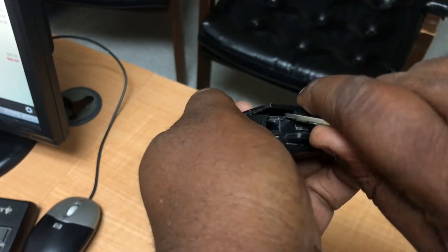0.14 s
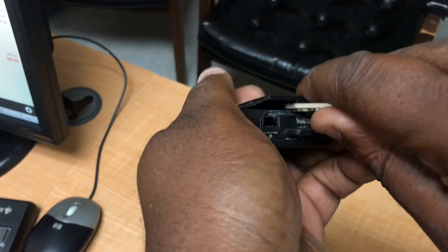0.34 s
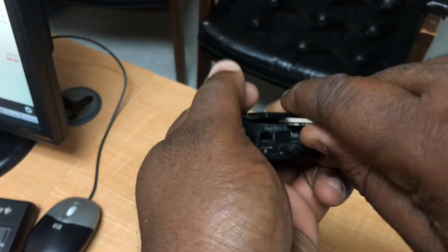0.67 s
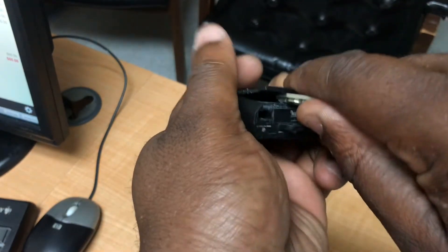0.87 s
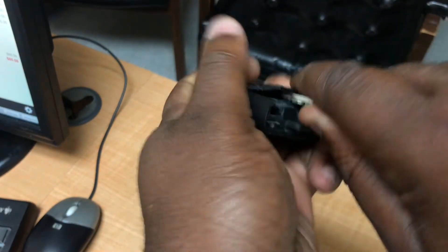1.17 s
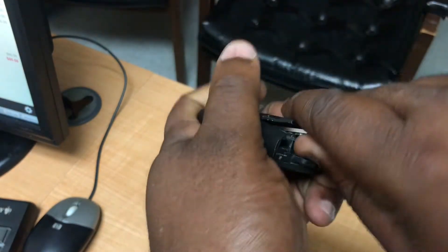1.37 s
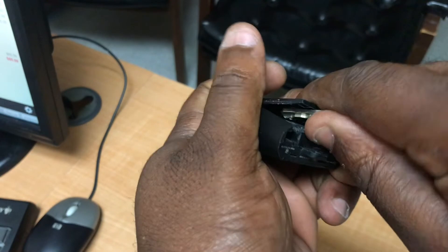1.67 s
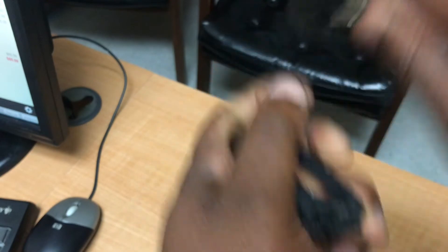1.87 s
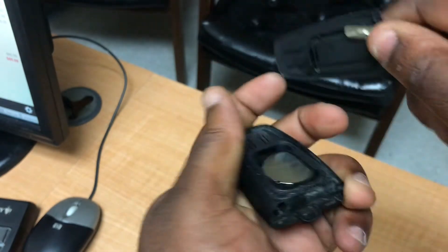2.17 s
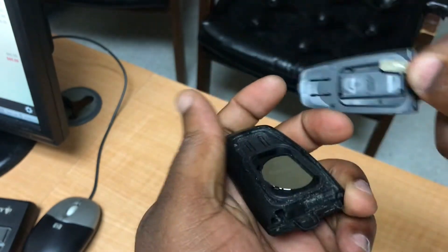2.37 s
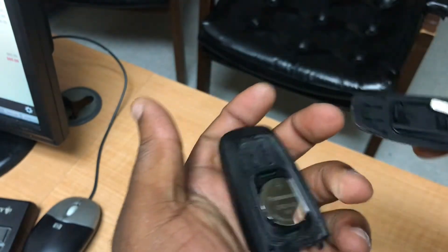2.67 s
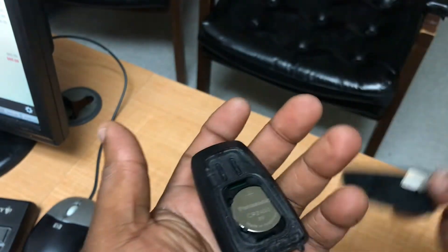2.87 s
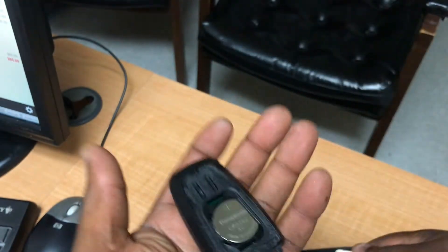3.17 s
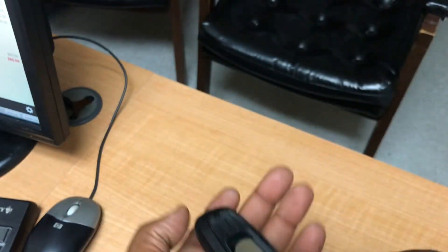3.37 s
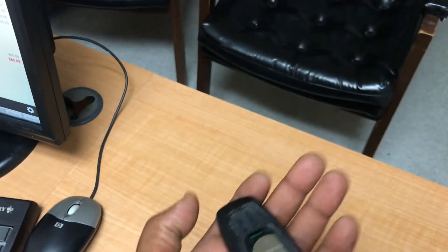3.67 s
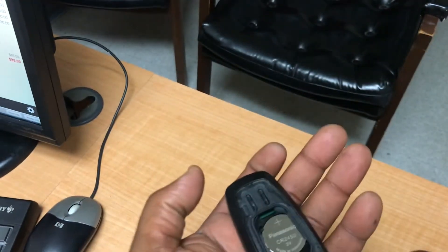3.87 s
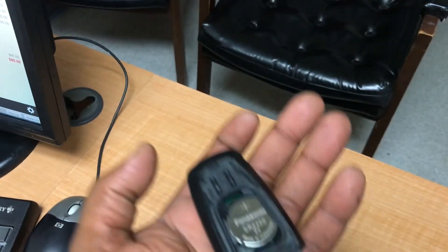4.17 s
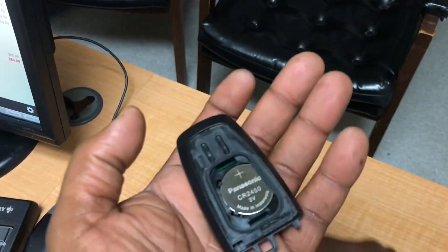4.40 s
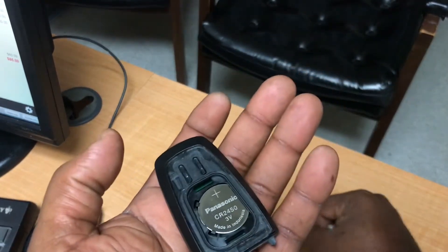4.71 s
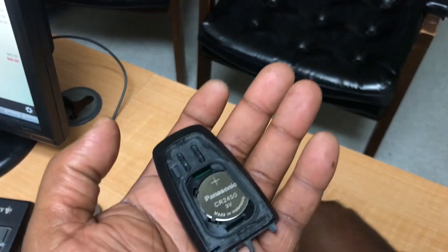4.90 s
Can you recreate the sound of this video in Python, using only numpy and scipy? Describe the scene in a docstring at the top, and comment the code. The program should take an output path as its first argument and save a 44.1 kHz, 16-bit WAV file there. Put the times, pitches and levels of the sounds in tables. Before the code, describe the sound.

A plastic key fob shell clicks while being pried, snaps open loudly, then its lid rattles onto a wooden desk, followed by a knock and short slide.

```python
"""A plastic key fob is pried apart with its metal key: the shell creaks and clicks, then snaps open.
Its lid rocks to rest on a wooden desk, and the key is laid down with a knock and slid over the wood.
Blows are sums of decaying modes with a noise crack; friction is a train of random slips, filtered.
A small office adds reflections; mains hum and ventilation lie underneath."""
import sys
import numpy as np
from scipy import signal
from scipy.fft import rfft, irfft
from scipy.io import wavfile

SR = 44100
rng = np.random.default_rng(int(sys.argv[2]) if len(sys.argv) > 2 else 0)


def int16_out(signal):
    """Quantize to a 16-bit WAV file."""
    q = np.round(np.clip(np.atleast_2d(signal).T, -1, 1) * 32767)
    wavfile.write(sys.argv[1], SR, q.astype(np.int16))


N = 222528
TIME = np.arange(N) / SR
BLOW_TIME = TIME[:SR // 5]  # time axis of one blow [s]

# the key levers the seam and it gives a little:
# (time [s], peak level of the ring [dB], contact time [ms], pitch factor)
PRIES = [(.118, -23, .17, 0.88), (.5702, -3.5, 0.0043, 1), (.7155, -36, 0.21, 1),
         (1.2522, -34.5, .09, 0.94), (1.3645, -27, 0.15, 0.83), (1.3727, -21.5, 0.092, 0.99),
         (1.6495, -51.5, 0.24, 0.97), (1.8608, -40, 0.087, 1)]
FIRM_DB = -35  # pries above this ring level are firm


def amp(db):
    """Level to amplitude: 20 dB is a factor of ten."""
    return 10 ** (np.asarray(db) / 20)


def unit(x):
    """Normalization to an rms value of 1."""
    return x / np.sqrt(np.mean(x ** 2) + 1e-20)


def read(points, hz):
    """Linear interpolation of a table on a logarithmic frequency axis."""
    table_hz, value = np.transpose(points)
    return np.interp(np.log(hz + 1), np.log(table_hz), value)


def colour(x, spectrum):
    """Spectral shaping: a gain at each frequency, then rms 1."""
    gain = amp(read(spectrum, np.fft.rfftfreq(len(x), 1 / SR)))
    return unit(irfft(rfft(x) * gain, len(x)))


def add(mix, start_s, sound):
    """Superposition: a sound is summed into the mix from its start time."""
    part = mix[max(round(start_s * SR), 0):][:len(sound)]
    part += sound[:len(part)]


def decay(t60_s):
    """Exponential damping: the level falls by 60 dB in t60."""
    return np.exp(-np.log(1000) * BLOW_TIME / t60_s)


def ringing(x, hz, quality, broad_db):
    """Resonance: one peak of given quality factor stands out of a broad bright band."""
    ring = signal.lfilter(*signal.iirpeak(min(hz, SR / 2 - 1), quality, SR), x)
    broad = signal.lfilter(*signal.butter(2, 1500, "high", fs=SR), x)
    return unit(unit(ring) + amp(broad_db) * unit(broad))


def grains(per_s, spread_db):
    """Friction as a random point process: tiny slips of uneven size and either sign."""
    size = amp(spread_db * np.minimum(rng.exponential(1, N), 4))
    sign = rng.choice([-1, 1], N)
    happens = rng.random(N) < per_s / SR
    return size * sign * happens


def blows(rows, modes, crack, rise_s, crack_t60):
    """Modal excitation: a brief crack and the body's modes; long contact excites fewer high ones."""
    hz, db, t60 = np.transpose(modes)[:, :, None]
    sign = (-1) ** np.arange(len(modes))[:, None]
    out = np.zeros(N)
    for start_s, ring_db, crack_db, pitch, contact_ms in rows:
        weight = sign * amp(db) / (1 + (hz * contact_ms / 500) ** 2)
        swell = 1 - np.exp(-BLOW_TIME * hz / (rise_s * hz.mean()))  # low modes take longer to start
        partials = weight * swell * decay(t60) * np.sin(2 * np.pi * hz * pitch * BLOW_TIME)
        ring = partials.sum(0)
        burst = colour(rng.standard_normal(len(BLOW_TIME)), crack) * decay(crack_t60)
        add(out, start_s, amp(ring_db) * ring / abs(ring).max() + amp(crack_db) * burst)
    return out


def cracking(rows, crack_db, dull_db_per_ms):
    """Contact mechanics: the crack follows the blow's strength and fades as contact lengthens."""
    return [(start_s, db, db + crack_db - dull_db_per_ms * contact_ms, pitch, contact_ms)
            for start_s, db, contact_ms, pitch in rows]


def blade_slips():
    """Stress release: a faint slip of the blade just before each firm pry."""
    lead_s, slip_db, contact_ms = .0235, -49, .04
    return [(start_s - lead_s, slip_db, contact_ms, pitch)
            for start_s, db, _, pitch in PRIES if db > FIRM_DB]


def prying():
    """Damped modes: the closed shell clicks at each pry, its ring shortened by the hand."""
    # modes of the closed shell: (frequency [Hz], relative level [dB], t60 [s])
    shell_modes = [(1008, -10.5, .015), (1234, -9, 0.012), (1676, -6.5, 0.011), (2039, 2, 0.0085),
                   (3480, -5.5, 0.0062), (4500, -15.5, 0.0066), (5500, -14, .004), (8400, -10.5, 0.0037),
                   (12122, -6, .0025)]
    # crack at the contact point: (frequency [Hz], relative spectral level [dB per Hz])
    crack_spectrum = [(200, -25), (900, -11.5), (2000, -4), (4000, -4), (5500, -1.5), (7200, -6),
                      (8600, -0.5), (10000, -5), (11800, 0.5), (16000, -5)]
    rows = cracking(PRIES + blade_slips(), crack_db=-4.5, dull_db_per_ms=68.5)
    return blows(rows, shell_modes, crack_spectrum, rise_s=0.00048, crack_t60=0.0077)


def opening():
    """Sudden release: the catches let go one after another and set lid and key ring sounding."""
    # releases: (time [s], peak level of the ring [dB], contact time [ms], pitch factor)
    snaps = [(1.8829, -2.5, .015, 0.99), (1.8857, -8, .05, 1.014), (1.8871, -11.5, .075, .947),
             (1.9265, -27.5, .025, 0.7)]
    # modes of the freed lid; the last, long and faint one is the key ring:
    # (frequency [Hz], relative level [dB], t60 [s])
    lid_and_key_ring_modes = [(257, -21.5, 0.027), (371.6, -18.5, 0.027), (660, -11.5, 0.02),
                              (969, -5.5, 0.037), (1484, -8, .014), (1674.5, -7, .02), (1983, -2, 0.023),
                              (2320, -5, 0.023), (2730, -5.5, 0.012), (3150, -2, 0.014), (3680, -7, .01),
                              (4443, -3.5, .01), (5650, -6, .006), (3060, -43.5, .6)]
    # crack of the splitting seam: (frequency [Hz], relative spectral level [dB per Hz])
    split_spectrum = [(150, -21), (600, -1.5), (2000, 0), (4000, 0), (6000, -3), (8000, -12.5), (11000, -9),
                      (16000, -16)]
    rows = cracking(snaps, crack_db=-6.5, dull_db_per_ms=105)
    return blows(rows, lid_and_key_ring_modes, split_spectrum, rise_s=0.00042, crack_t60=0.015)


def landings(count):
    """Energy loss in rocking: swings shorten, and landings soften and weaken overall."""
    # graze, landing and rebound of the rim: (delay [s], level offset [dB], extra contact time [ms])
    rim_points = [(-.0028, -16, 0), (0, 1, 0.0059), (.0027, -2, 0.052)]
    first_s, gap_s, gap_ratio = 3.8946, .0732, .914
    # loss per e-fold of the swing count; the lean favours every other landing, on the heavy side
    start_db, loss_db, lean_db = -28, 5, 1.1
    first_contact_ms, soften_ms = 0.034, 0.068  # softening per e-fold of the swing count
    mean_pitch, pitch_scatter = 0.98, 0.048  # every landing meets another spot of the rim
    rows, swing_s = [], first_s
    for k, spot in enumerate(rng.uniform(-1, 1, count)):
        level_db = start_db - loss_db * np.log(1 + k) - lean_db * (-1) ** k
        contact_ms = first_contact_ms + soften_ms * np.log(1 + k)
        pitch = mean_pitch + pitch_scatter * spot
        rows += [(swing_s + delay, level_db + db, contact_ms + extra_ms, pitch)
                 for delay, db, extra_ms in rim_points]
        swing_s += gap_s * gap_ratio ** k
    return rows


def rocking():
    """Repeated impact: the lid's rim strikes the desk top from side to side until it rests."""
    # modes of the rim against the desk: (frequency [Hz], relative level [dB], t60 [s])
    rim_modes = [(383, 0.5, 0.021), (587, 0, 0.04), (935, -2.5, 0.086), (1123, -6.5, 0.013),
                 (1605, -3.5, 0.017), (2140, -4, 0.014), (2700, -8, 0.018), (3860, 1, 0.0044),
                 (5430, -5, 0.014)]
    # clack of the contact: (frequency [Hz], relative spectral level [dB per Hz])
    clack_spectrum = [(150, 6), (600, 8), (1500, 6), (3800, 2), (5400, -10.5), (6500, -10), (10500, -45),
                      (12500, -19.5), (16000, -22)]
    rows = cracking(landings(count=6), crack_db=3.0, dull_db_per_ms=58)
    return blows(rows, rim_modes, clack_spectrum, rise_s=0.00087, crack_t60=0.016)


def knocking():
    """Plate modes: things and knuckles land on the desk top, which answers with its resonances."""
    # knocks: (time [s], peak ring level [dB], initial crack level [dB], pitch factor, contact time [ms])
    knocks = [(3.6957, -30.5, -26, 0.88, 0.38), (3.7106, -34.5, -31.5, 0.96, 0.49),
              (3.7278, -43, -41, 0.96, 0.192), (4.2432, -15.5, -46, 0.97, 0.068),
              (4.2562, -22.5, -27.5, 1, 0.14)]
    # modes of the desk top: (frequency [Hz], relative level [dB], t60 [s])
    desk_modes = [(147, -13.5, 0.062), (222.3, -7, 0.07), (281.4, -1.5, 0.066), (398, -1.5, 0.047),
                  (596, -8.5, 0.062), (703, -6.5, 0.045), (934, -3, 0.033), (1305, -6.5, 0.029),
                  (1906, -12, 0.021)]
    # tap of the contact: (frequency [Hz], relative spectral level [dB per Hz])
    tap_spectrum = [(150, -11), (900, -12), (1500, -14), (2800, -2), (3900, -4), (5700, -2.5), (7000, -9.5),
                    (11000, -10), (15500, -7.5)]
    return blows(knocks, desk_modes, tap_spectrum, rise_s=0.0006, crack_t60=0.015)


def slide():
    """Friction of the key: slips drive the desk's resonances; finer ones hiss, a few crackle."""
    # course of the slide: (time [s], wood drone level [dB], hiss level [dB]), both before a fixed trim
    course = [(4.285, -33, -72), (4.305, -39.5, -57.5), (4.431, -42, -52.5), (4.455, -38.5, -56.5),
              (4.521, -39.5, -52), (4.533, -45.5, -53.5), (4.597, -40.5, -59.5), (4.643, -56.5, -66),
              (4.7, -66, -66.5)]
    # drone of the wood: (frequency [Hz], relative spectral level [dB per Hz])
    grain_spectrum = [(120, -19), (250, 3), (420, 0.5), (500, -10.5), (590, 4), (740, -12), (910, -3.5),
                      (1120, -15), (1350, -13.5), (2000, -20), (4000, -31.5), (8000, -43)]
    # hiss of the fine slips: (frequency [Hz], relative spectral level [dB per Hz])
    scrape_spectrum = [(800, -6), (2500, 4), (4000, 7), (5700, 4), (7300, -5), (9000, 4), (10500, -2.5),
                       (13000, 5), (16000, 3.5)]
    knot_s, drone_db, hiss_db = np.transpose(course)
    drone = colour(grains(per_s=1200, spread_db=2.0), grain_spectrum)
    drone *= amp(np.interp(TIME, knot_s, drone_db) - 1.0)
    hiss = colour(grains(per_s=3500, spread_db=2.5), scrape_spectrum)
    crackle = ringing(grains(per_s=170, spread_db=-0.5), hz=5170, quality=3.6, broad_db=-8)
    scrape = (hiss + amp(-6.5) * crackle) * amp(np.interp(TIME, knot_s, hiss_db) - 1.8)
    fade = np.clip(np.minimum(TIME - knot_s[0], knot_s[-1] - TIME) / 0.011, 0, 1)
    return (drone + scrape) * fade


def blade(t60):
    """Resonant decay: the metal blade ticks brightly on what it touches."""
    # ticks: (time [s], level before the decay [dB rms], resonance [Hz])
    ticks = [(1.9484, -19.5, 9800), (1.9507, -25, 8000), (1.9592, -18.5, 3950), (2.8584, -55, 6010),
             (4.2522, -28.5, 4600), (4.262, -28.5, 4500), (4.8184, -51, 4500)]
    out = np.zeros(N)
    for start_s, db, hz in ticks:
        tick = ringing(rng.standard_normal(len(BLOW_TIME)), hz, quality=5.7, broad_db=-8.5)
        add(out, start_s, amp(db) * tick * decay(t60))
    return out


def fingers():
    """Granular friction: fingers shift their grip; shell and blade strain around each pry."""
    # shifts of the grip: (time [s], length [s], level before the window [dB rms], centre [Hz])
    rubs = [(0.032, 0.039, -64, 12500), (1.077, 0.037, -68, 10940), (1.35, .046, -50, 5100),
            (2.447, 0.1, -66.5, 3550), (2.703, 0.029, -58.5, 2450), (4.695, .16, -68, 13030),
            (4.9, .062, -60.5, 13500)]
    # creak of the loaded shell, scrape of the blade: (lead before the pry [s], length [s],
    # level at FIRM_DB before the window [dB rms], slope [dB per dB of pry level], centre [Hz])
    strain_kinds = [(0.088, 0.18, -68, 0.1668, 2000), (0.024, 0.046, -65.5, 0.4263, 16000)]
    out, slips = np.zeros(N), grains(per_s=11000, spread_db=3.5)
    strain = [(max(pry_s - lead, 0), length, db + follow * (pry_db - FIRM_DB), hz)
              for pry_s, pry_db, _, _ in PRIES
              for lead, length, db, follow, hz in strain_kinds]
    for start_s, length, db, hz in rubs + strain:
        piece = slips[round(start_s * SR):][:round(length * SR)]
        stroke = ringing(piece, hz, quality=4.2, broad_db=-4.0)
        add(out, start_s, amp(db) * stroke * np.hanning(len(stroke)))
    return out


def squeak():
    """Stick and slip of the plastic, rendered as noise through a sharp resonance: a narrow tone."""
    # one squeak: (time [s], length [s], level before the window [dB rms], frequency [Hz])
    start_s, length, db, hz = (2.625, .075, -68, 2390)
    out = np.zeros(N)
    tone = ringing(rng.standard_normal(round(length * SR)), hz, quality=45, broad_db=-24.5)
    add(out, start_s, amp(db) * tone * np.hanning(len(tone)))
    return out


def palm():
    """Damped oscillation: soft low pushes as the fob jolts in the hand and is caught."""
    # jolts: (time [s], initial amplitude [dB], frequency [Hz], t60 [s])
    jolts = [(1.366, -43, 150, 0.037), (1.9501, -28, 205, 0.014), (1.9523, -39.5, 75, 0.085),
             (1.9603, -30.5, 108, 0.03)]
    out = np.zeros(N)
    for start_s, db, hz, t60 in jolts:
        add(out, start_s, amp(db) * np.sin(2 * np.pi * hz * BLOW_TIME) * decay(t60))
    return out


def room(x, wet_db, early):
    """Reverberation: strong early reflections off desk and screen, a tail dying band by band."""
    # reverberation time: (frequency [Hz], t60 [s])
    reverberation = [(150, 0.62), (600, 0.42), (2000, 0.34), (4000, 0.4), (9000, .33), (16000, 0.2)]
    taps, t = np.zeros(SR), TIME[:SR]
    at = np.arange(0, SR - 10, 10)
    taps[at + rng.integers(0, 10, len(at))] = rng.choice([-1, 1], len(at))
    hz, age, bands = signal.stft(taps, SR, nperseg=256)
    bands = bands * amp(-60 * age / read(reverberation, hz)[:, None])
    tail = signal.istft(bands, SR, nperseg=256)[1][:SR]
    tail *= 1 - np.exp(-np.maximum(t - .0025, 0) / 0.0017)  # nothing before 2.5 ms
    tail *= 1 + early * np.exp(-(t / .033) ** 4)
    return x + amp(wet_db) * signal.fftconvolve(x, tail / np.linalg.norm(tail))[:N]


def office():
    """Stationary background: ventilation as shaped noise, and hum tones of wavering phase."""
    # ventilation rumble: (frequency [Hz], relative spectral level [dB per Hz])
    air_spectrum = [(22, -49.5), (36, -7), (75, -3.5), (130, -3), (200, -8.5), (300, -12.5), (450, -17.5),
                    (650, -22.5), (1300, -28.5), (2500, -32.5), (5000, -36.5), (10000, -39), (12500, -38.5),
                    (16000, -39)]
    # mains hum and ventilation tones: (frequency [Hz], level [dB rms])
    hum_tones = [(39, -66.5), (59.2, -60), (72.5, -62), (118.4, -70), (145, -71), (176.8, -63), (210, -75),
                 (241, -67), (382, -79.5)]
    out = amp(-60.5) * colour(rng.standard_normal(N), air_spectrum)
    knots = np.linspace(0, TIME[-1], 20)
    for hz, db in hum_tones:
        drift = 0.41 * np.interp(TIME, knots, rng.standard_normal(len(knots)))  # phase [rad]
        out += np.sqrt(2) * amp(db) * np.sin(2 * np.pi * hz * TIME + drift)
    return out


def scene():
    """Direct-to-reverberant ratio: the shell is near, the desk farther off and wetter."""
    pries = room(prying(), wet_db=-13.5, early=0.41)
    snap = room(opening(), wet_db=-7.5, early=0.67)
    lid = room(rocking(), wet_db=-6.5, early=0.098)
    knocks = room(knocking(), wet_db=-5.0, early=0.51)
    sliding = room(slide(), wet_db=-5.0, early=.4)
    small = room(blade(t60=0.0071) + fingers() + squeak(), wet_db=-13, early=0.47)
    return (pries + snap + lid + knocks + sliding + small + palm() + office())[None]


def record(dry):
    """Level-dependent noise: loud peaks bring up a hiss; then full-scale clipping and a band limit."""
    loud = abs(dry[0]) > .35
    since_s = TIME - np.maximum.accumulate(np.where(loud, TIME, -1))
    held = since_s < .408
    # hiss: (frequency [Hz], relative spectral level [dB per Hz])
    hiss_spectrum = [(200, 2), (1000, 2.0), (3000, 1.0), (8000, -3), (16000, -8.5)]
    hiss = colour(rng.standard_normal(N), hiss_spectrum)
    out = np.clip(dry + amp(-62.5) * held * hiss, -1, 1)
    low_pass = signal.firwin(255, 16200, window=("kaiser", 10), fs=SR)  # edge at 16.2 kHz
    return signal.oaconvolve(out, low_pass[None], "same")


dry = scene()
out = record(dry)
int16_out(out)
```